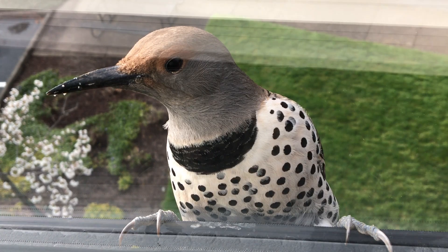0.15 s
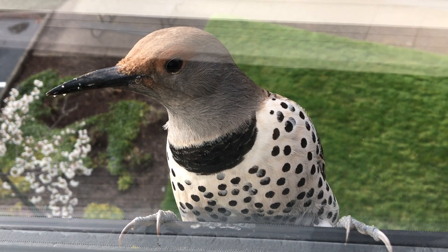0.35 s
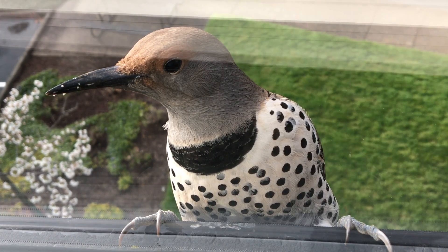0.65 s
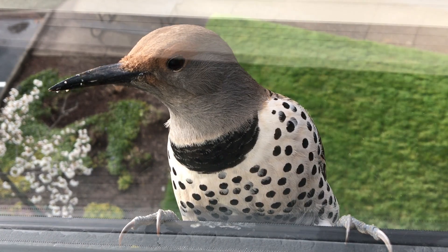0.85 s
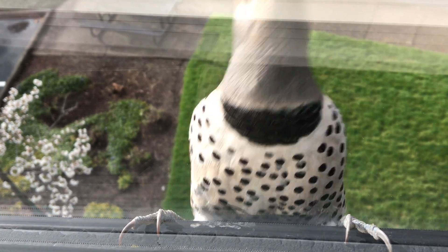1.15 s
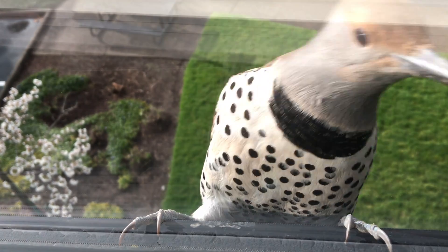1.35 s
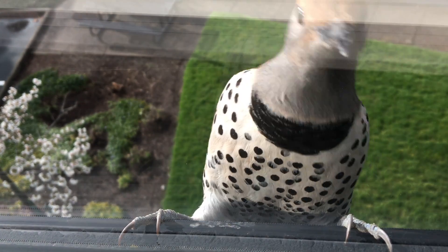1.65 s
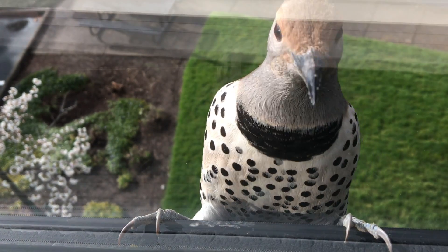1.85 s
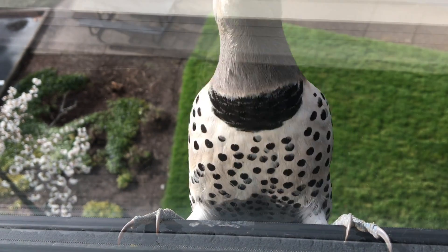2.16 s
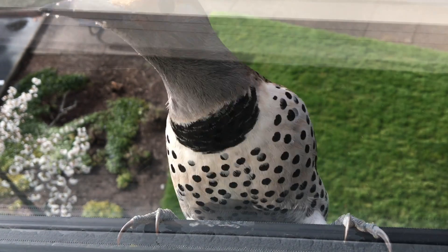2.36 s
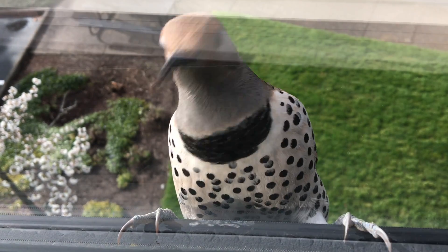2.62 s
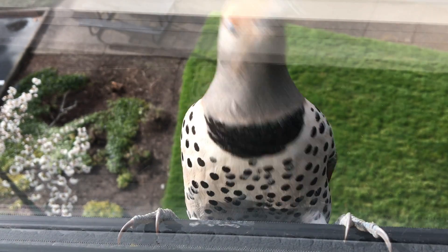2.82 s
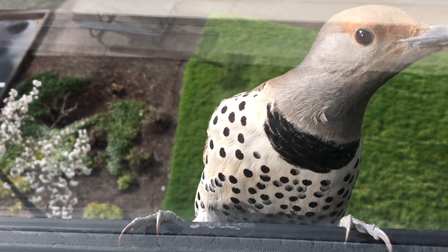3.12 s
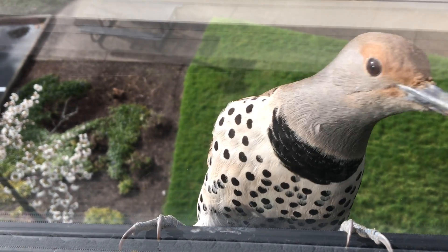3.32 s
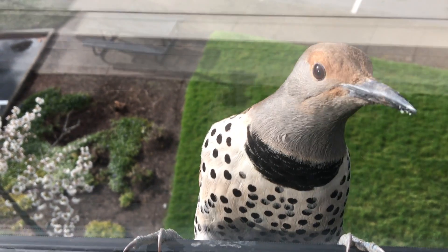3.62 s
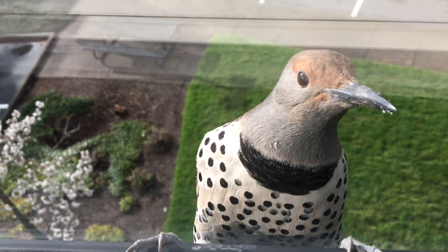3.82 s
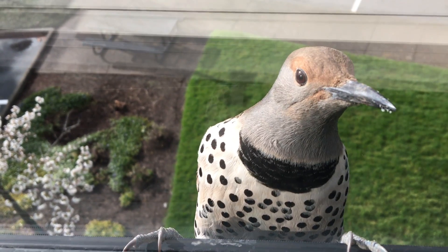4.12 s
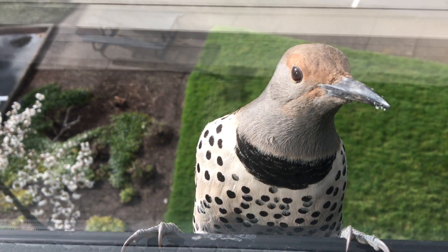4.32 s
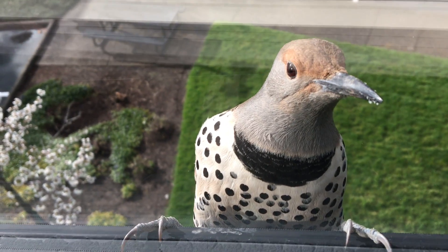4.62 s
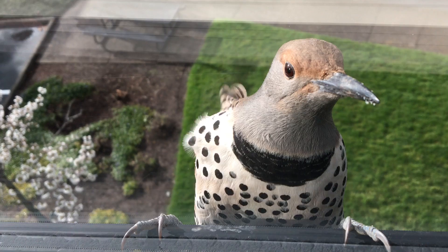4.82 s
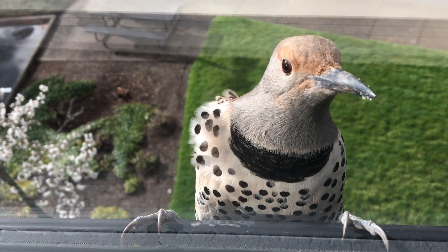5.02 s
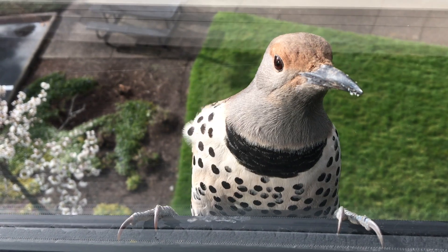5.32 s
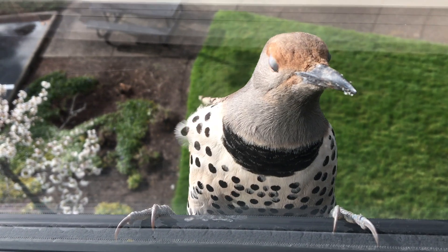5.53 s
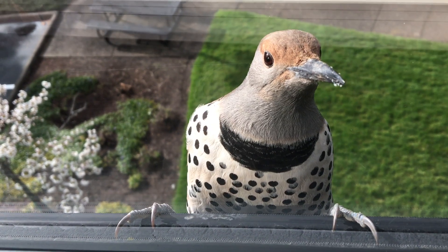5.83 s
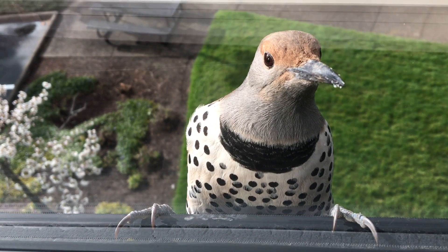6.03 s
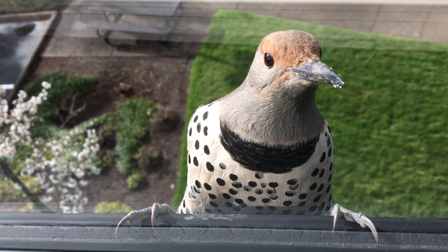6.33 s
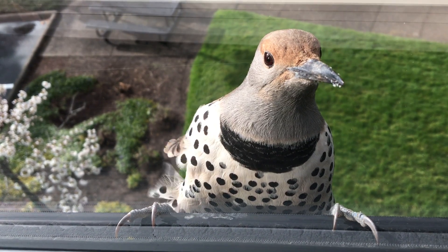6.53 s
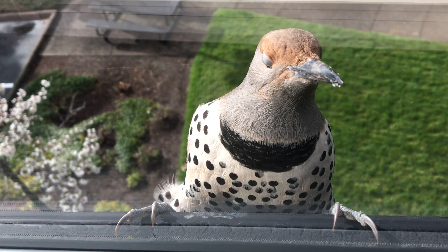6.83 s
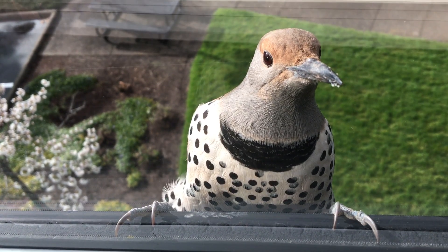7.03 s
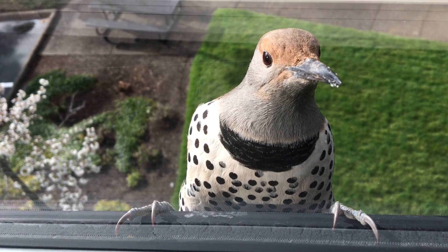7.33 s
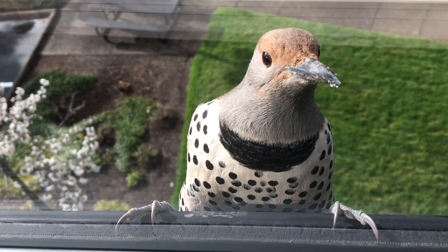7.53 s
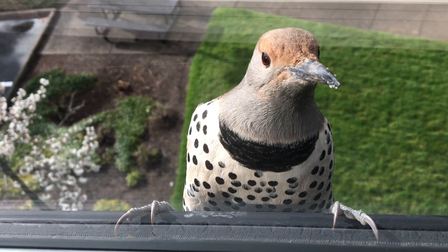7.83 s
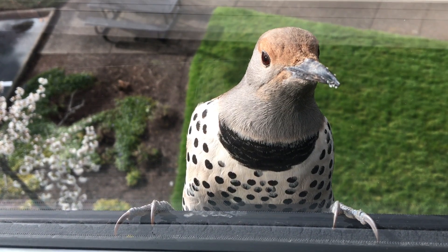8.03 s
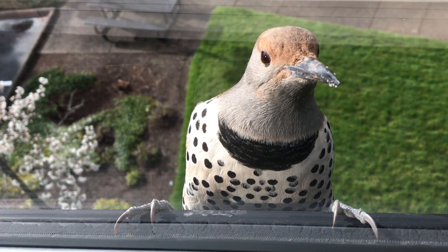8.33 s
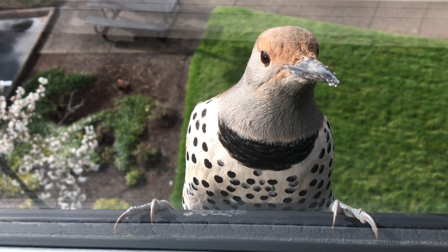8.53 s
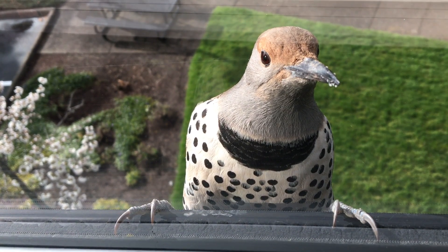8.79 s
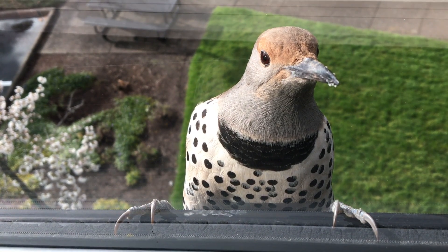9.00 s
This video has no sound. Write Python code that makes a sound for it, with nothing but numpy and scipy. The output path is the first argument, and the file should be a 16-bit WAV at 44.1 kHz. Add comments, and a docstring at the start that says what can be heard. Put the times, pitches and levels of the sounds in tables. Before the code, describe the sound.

A woodpecker taps at a window, heard close from just inside over a steady low room hum. Early on, a run of soft, hoarse chirps comes muffled through the glass. Scattered light ticks build to a quick flurry of scrapes ending in one loud stroke. A blunt hit leaves the pane ringing briefly, a heavy knock follows, and only faint ticks remain.

```python
"""Over a low, steady room hum, a woodpecker ticks and scrapes at a window, heard from just inside.
Each contact of bill or claw gives a bright click, a knock of the frame, a thud of the pane and a short
ring; the harder the tip, the more click. Early on a bird chirps softly, muffled by the glass.
A flurry of scrapes ends in one loud stroke, then a blunt hit leaves the glass ringing and a heavy knock
follows. Two faint whistles sound far off near the end."""
import sys
import numpy as np
from scipy import signal
from scipy.fft import rfft, irfft, next_fast_len
from scipy.io import wavfile
from scipy.ndimage import uniform_filter1d

SR = 44100
rng = np.random.default_rng(int(sys.argv[2]) if len(sys.argv) > 2 else 0)


def generate_wav(sig):
    """Save sig (samples, or channels by samples) to the path in sys.argv[1] as 16-bit PCM at SR."""
    pcm = np.round(np.clip(np.atleast_2d(sig).T, -1, 1) * 32767).astype(np.int16)
    wavfile.write(sys.argv[1], SR, pcm)


N = 403956

# tone colours of the tip's click, the frame's knock and the pane's thud: (frequency [Hz], level [dB])
CLICK_EQ = [(1200, -44), (2600, -9), (3300, -2.5), (4100, -3.5), (5500, 0.5), (8200, -2), (9600, -2.5),
            (10500, -10.5), (11800, -4.5), (13000, -6.5), (15800, -12.5)]
FRAME_EQ = [(200, -38), (480, 3.5), (700, 3.5), (950, 4), (1250, 1.5), (1420, -4.5), (1550, -4),
            (1900, -6.5), (2400, -6.5), (3300, -12.5), (5500, -25), (10000, -70)]
PANE_EQ = [(70, -45.5), (180, -5), (290, 0.5), (370, -2.5), (500, -16), (900, -26), (2500, -85)]


def amp(db):
    """Decibels to gain."""
    return 10 ** (np.asarray(db) / 20)


def unit(x):
    """Scale to rms 1."""
    return x / np.sqrt(np.mean(x ** 2) + 1e-20)


def along(points, hz):
    """Read a curve of (frequency, value) points on a log axis."""
    freqs, values = np.transpose(points)
    return np.interp(np.log(hz + 1), np.log(freqs), values)


def add(track, s, sound):
    """Mix a sound in at s seconds."""
    part = track[round(s * SR):][:len(sound)]
    part += sound[:len(part)]


def fade(t, t60):
    """A decay of 60 dB in t60 seconds."""
    return np.exp(-np.log(1000) * t / t60)


def coloured(x, eq, tilt_db=0):
    """Minimum-phase EQ that keeps attacks sharp, tilted by tilt_db per octave above 2 kHz."""
    size = 2 * next_fast_len(len(x) // 2 + 4096)
    hz = np.fft.rfftfreq(size, 1 / SR)
    octaves = np.log2(np.maximum(hz, 2000) / 2000)
    cepstrum = irfft(np.log(amp(along(eq, hz) + tilt_db * octaves)), size)
    cepstrum[1:size // 2] *= 2
    cepstrum[size // 2 + 1:] = 0
    return irfft(rfft(x, size) * np.exp(rfft(cepstrum)), size)[:len(x)]


def room_tone():
    """Ventilation rumbles in the room's low resonances under a thin hiss."""
    # spectra of the rumble and the hiss: (frequency [Hz], level [dB])
    hum_eq = [(20, -22.5), (32, -19), (47, -5.5), (58, 2.5), (70, -7.5), (88, -10.5), (122, -15.5),
              (136, -10), (155, -15.5), (212, -21), (233, -13.5), (285, -21.5), (420, -31.5), (700, -44.5),
              (1500, -77)]
    air_eq = [(200, -11.5), (500, 2.5), (750, -3), (1080, -2.5), (1550, -9), (1850, -7.5), (2700, -14.5),
              (4400, -16), (4900, -19.5), (6000, -17.5), (9300, -19.5), (10400, -22.5), (11500, -19.5),
              (15800, -24)]
    hum = amp(-49) * unit(coloured(rng.standard_normal(N), hum_eq))
    air = amp(-72) * unit(coloured(rng.standard_normal(N), air_eq))
    return hum + air


def room_reverb(x, predelay_s=.0067):
    """The room answers with a short tail in which the treble dies first."""
    # reverb time: (frequency [Hz], t60 [s])
    decays = [(200, 0.42), (2000, .28), (12000, 0.13)]
    hz, t, noise = signal.stft(rng.standard_normal(SR // 2), SR, nperseg=256)
    tail = signal.istft(noise * fade(t, along(decays, hz)[:, None]), SR, nperseg=256)[1]
    response = np.pad(tail / np.linalg.norm(tail), (int(predelay_s * SR), 0))
    return signal.fftconvolve(x, response)[:N]


def whistles(width_hz=90):
    """Far-off, fuzzy tones of narrow-band noise swell and fade in the hiss."""
    # thin whistles: (time [s], length [s], pitch [Hz], level [dB])
    cues = [(6.25, 0.45, 1700, -79.5), (8.76, 0.4, 1860, -81)]
    out = np.zeros(N)
    for s, length, hz, db in cues:
        band = signal.butter(2, [hz - width_hz / 2, hz + width_hz / 2], "bandpass", fs=SR, output="sos")
        tone = unit(signal.sosfilt(band, rng.standard_normal(SR)))[:int(length * SR)]
        add(out, s, amp(db) * tone * np.hanning(len(tone)) ** .5)
    return out


def chirps(length_s=.0502, arch=.17, glide_spread=.202, waver=.09, rasp=.65, octave_db=-9.5):
    """Hoarse yelps arch in pitch, leaning up or down; the glass passes only their lowest partials."""
    # the bird's calls: (time [s], relative level [dB], pitch [Hz])
    cues = [(1.273, -56, 965), (1.505, -57.5, 1170), (1.676, -55, 987), (1.916, -54, 1160),
            (2.081, -57, 1064), (2.27, -59, 1040), (2.433, -55.5, 980), (2.534, -60, 894),
            (2.641, -57, 1020), (2.804, -56, 1047), (3.017, -55.5, 1040), (3.179, -56, 977),
            (3.385, -56, 982), (3.561, -63, 1040)]
    # their rasp as it comes through the glass: (frequency [Hz], level [dB])
    muffled_eq = [(600, -36), (880, -1), (1080, 5.5), (1350, 2.5), (1600, -2), (1950, 6), (2200, -20),
                  (2700, -32), (4500, -47)]
    out = np.zeros(N)
    progress = np.arange(int(length_s * SR)) / SR / length_s
    swell = np.sin(np.pi * progress ** .5) ** 2
    for s, db, hz in cues:
        jitter = unit(uniform_filter1d(rng.standard_normal(len(progress)), size=40))
        glide = rng.normal(0, glide_spread) * (progress - .5)
        pitch = hz * (1 + arch * (np.sin(np.pi * progress) - .7) + glide + waver * jitter)
        phase = 2 * np.pi * np.cumsum(pitch) / SR
        tone = unit(np.sin(phase) + amp(octave_db) * np.sin(2 * phase))
        hoarse = unit(coloured(rng.standard_normal(len(progress)), muffled_eq))
        voice = np.sqrt(1 - rasp ** 2) * tone + rasp * hoarse
        add(out, s - .005, amp(db - 7.5) * swell * voice)
    return out


def slipping(contact_s, count=7):
    """The tip lands, then catches and slips a few times before it comes to rest."""
    span = max(contact_s, .0002) * SR
    catches = (span * np.r_[0, rng.random(count - 1)]).astype(int)
    return np.bincount(catches, rng.uniform(.51, 1, count) * rng.choice([-1, 1], count))


def struck(drive, eq, t60, spike, tilt_db=0):
    """A struck part gives a first spike, then countless modes dying together."""
    t = np.arange(SR // 2) / SR
    modes = rng.standard_normal(len(t)) * fade(t, t60)
    modes[0] += spike * np.linalg.norm(modes)
    hit = signal.fftconvolve(coloured(modes, eq, tilt_db), drive)[:len(t)]
    return hit / np.sqrt(np.sum(hit ** 2) / (.03 * SR))  # the energy of 30 ms at rms 1


def window_resonance(x):
    """The window adds its resonances to whatever strikes it."""
    # resonant peaks: (frequency [Hz], width [Hz], gain [dB])
    peaks = [(1240, 22, -3.5), (1410, 53, 1.5), (1910, 65, 2.5), (3650, 54, 1), (4520, 32, 6.5),
             (5150, 39, -8.5), (5540, 80, -4), (6930, 49, 1), (7150, 64, -5), (8200, 70, -6), (8440, 63, 0),
             (9750, 57, -1)]
    return x + sum(amp(db) * signal.lfilter(*signal.iirpeak(hz, hz / width, fs=SR), x)
                   for hz, width, db in peaks)


def contact(contact_s, click_db, knock_db, thud_db, ring_db, tilt_db,
            click_t60=.07, knock_t60=.14, ring_t60=.2):
    """One hit in four layers: the tip's click, the frame's knock, the pane's thud, a lingering ring."""
    # tone colour of the ring: (frequency [Hz], level [dB])
    ring_eq = [(900, -59), (1350, -33), (1640, -7), (1900, -2), (2190, -9.5), (2480, -15), (4200, -16),
               (9000, -75.5)]
    slips = slipping(contact_s)
    t = np.arange(SR // 100) / SR
    push = np.exp(-t / .00093) * rng.standard_normal(len(t))
    snap = (.0019 / max(contact_s, .0003)) ** .19  # a brief contact puts more into its first spike
    click = struck(slips, CLICK_EQ, click_t60, spike=.5 * snap, tilt_db=tilt_db)
    knock = struck(slips, FRAME_EQ, knock_t60, spike=.39, tilt_db=min(tilt_db, 0))
    thud = struck(push, PANE_EQ, t60=.27, spike=.2)
    ring = struck([1], ring_eq, ring_t60, spike=.12)
    attack = window_resonance(amp(click_db) * click + amp(knock_db) * knock)
    return amp(-1) * attack + amp(thud_db) * thud + amp(ring_db) * ring


def scuffle(grains_per_s=4000, ring_hz=1890, ring_width_hz=100):
    """Fine scratching fills the gaps of the flurry and keeps the frame ringing."""
    # how hard the bird scratches: (time [s], gain [dB])
    effort_curve = [(4.95, -15), (5.0, 2), (5.06, 6.5), (5.12, -16), (5.19, 6), (5.3, 8), (5.39, -6.5),
                    (5.5, -4), (5.62, 13), (5.7, -2), (5.76, -18)]
    t = np.arange(N) / SR
    effort = amp(np.interp(t, *np.transpose(effort_curve), left=-np.inf, right=-np.inf))
    grains = (rng.random(N) < grains_per_s / SR) * rng.standard_normal(N)
    ring = signal.lfilter(*signal.iirpeak(ring_hz, ring_hz / ring_width_hz, fs=SR), grains)
    rustle = sum(amp(db) * unit(coloured(grains, eq))
                 for eq, db in [(CLICK_EQ, -74), (FRAME_EQ, -73), (PANE_EQ, -68.5)])
    return effort * (rustle + amp(-75) * unit(ring))


def skitter(start_s=4.98, end_s=5.5, count=12, db=-71, spread_db=3):
    """Faint ticks fall at uneven steps between the strokes of the flurry."""
    out = np.zeros(N)
    for k, (late, accent) in enumerate(rng.uniform(-1, 1, (count, 2))):
        s = start_s + (end_s - start_s) * (k + 1 + late / 2) / (count + 2)
        tick = contact(.005, click_db=-1.5, knock_db=-2.5, thud_db=5.5, ring_db=-10, tilt_db=7)
        add(out, s, amp(db + spread_db * accent) * tick)
    return out


def bumps():
    """Soft contacts: frame and pane answer with hardly any click."""
    # dull bumps against the frame: (time [s], level [dB])
    cues = [(1.955, -57), (2.058, -65.5), (2.986, -67), (3.014, -69.5), (3.654, -66.5), (3.908, -68),
            (4.653, -59), (6.771, -66.5), (8.671, -65)]
    out = np.zeros(N)
    for s, db in cues:
        bump = contact(.0022, click_db=-18.5, knock_db=-.5, thud_db=4.5, ring_db=-29, tilt_db=-6.5)
        add(out, s, amp(db) * bump)
    return out


def taps(even_hardness=.42):
    """A harder tip gives a louder, brighter click and less knock; at even_hardness the two balance."""
    # taps of a hard tip: (time [s], level [dB], hardness [0-1])
    cues = [(0.839, -68, 0.24), (0.879, -64.5, 0.37), (2.358, -75, 0.5), (3.247, -77, 0.92),
            (3.362, -77, 0.94), (3.714, -56.5, 0.74), (3.813, -74, 0.5), (4.591, -74, 1), (4.77, -57, 0.63),
            (4.81, -64, 0.32), (5.005, -58, 0.37), (5.525, -59, 0.73), (6.216, -55.5, 0.57),
            (6.422, -70.5, 0.86), (6.656, -60.5, 0.64), (8.695, -66.5, 0.28)]
    out = np.zeros(N)
    for s, db, hardness in cues:
        hard, force_db = hardness - even_hardness, db + 60
        click_db, knock_db = 12.5 * hard, -12.5 * hard
        # a stronger tap stays longer on the glass, a harder tip leaves sooner
        contact_s = .0022 * amp(force_db) ** .4 * np.exp(-1.5 * hard)
        thud_db = knock_db + 3 + .313 * force_db  # a heavy tap moves the whole pane
        tap = contact(contact_s, click_db, knock_db, thud_db,
                      ring_db=knock_db - 6.5, tilt_db=15.5 * hard - 2.5)
        add(out, s, amp(db) * tap)
    return out


def scrapes():
    """Longer, bright strokes in which the tip skids over the window."""
    # strokes of the flurry: (time [s], level [dB], contact time [s])
    cues = [(5.037, -67, .008), (5.053, -59.5, .0056), (5.065, -53, 0.0032), (5.229, -59, .003),
            (5.237, -52.5, 0.0031), (5.265, -56, 0.0027), (5.294, -53, 0.0058), (5.312, -46, .0028),
            (5.5651, -42, .0041), (5.5702, -36, .005), (5.637, -49.5, 0.0088), (5.652, -47.5, 0.0039)]
    out = np.zeros(N)
    for s, db, contact_s in cues:
        stroke = contact(contact_s, click_db=.5, knock_db=-8.5, thud_db=-11.5, ring_db=-13.5, tilt_db=2,
                         click_t60=.058, ring_t60=.26)
        add(out, s, amp(db) * stroke)
    return out


def ringing_hit(at_s=5.932, hit_db=-52.5, glass_db=-47, attack_s=.003):
    """A blunt hit leaves the glass ringing near 2 kHz."""
    # modes of the glass: (frequency [Hz], relative level [dB], t60 [s])
    glass_modes = [(1935, 0, 0.09), (2010, -10, 0.21), (2067, -7, 0.29), (2213, -14, 0.41),
                   (2950, -20, 0.2), (3435, -22, 0.18), (4011, -19, 0.25)]
    out, t = np.zeros(N), np.arange(SR // 2) / SR
    hit = contact(.004, click_db=-1.5, knock_db=0, thud_db=-16, ring_db=4.5, tilt_db=-4,
                  click_t60=.08, ring_t60=.18)
    glass = sum(amp(db) * fade(t, t60) * np.sin(2 * np.pi * (hz * t + rng.random()))
                for hz, db, t60 in glass_modes)
    onset = 1 - np.exp(-t / attack_s)
    add(out, at_s, amp(hit_db) * hit + amp(glass_db) * onset * glass)
    return out


def heavy_knock(at_s=7.248, db=-43.5):
    """A blow with the bird's weight behind it shakes the pane: a crisp click over a tight, low thud."""
    out = np.zeros(N)
    blow = contact(.0025, click_db=-4.5, knock_db=-1, thud_db=5, ring_db=-14.5, tilt_db=0,
                   click_t60=.066, knock_t60=.12)
    add(out, at_s, amp(db) * blow)
    return out


def scene():
    """Mono mix: the woodpecker close and nearly dry, the chirps wetter, room tone underneath."""
    hum, calls = room_tone(), chirps()
    woodpecker = taps() + bumps() + scrapes() + ringing_hit() + heavy_knock() + scuffle() + skitter()
    reverb = amp(-20) * room_reverb(woodpecker) + amp(-9) * room_reverb(calls)
    return (hum + whistles() + reverb + calls + woodpecker)[None]


def record(dry, cutoff_hz=15800):
    """A steep low-pass takes off the highest treble."""
    return signal.sosfilt(signal.ellip(12, .1, 80, cutoff_hz, fs=SR, output="sos"), dry)


dry = scene()
out = record(dry)
generate_wav(out)
```